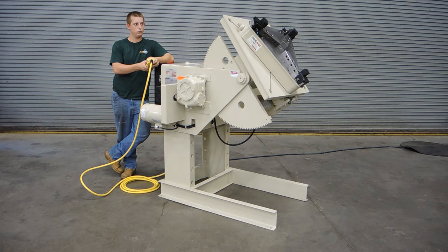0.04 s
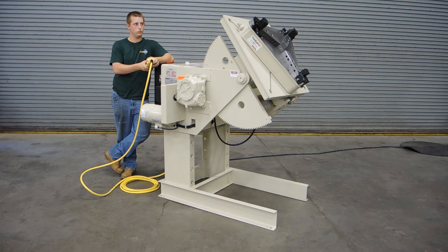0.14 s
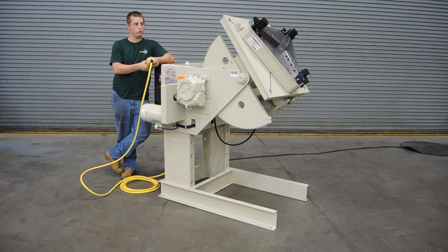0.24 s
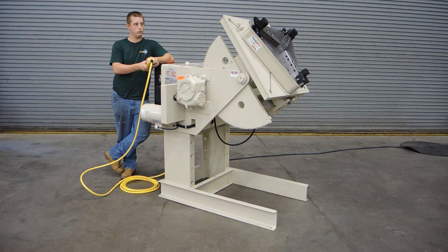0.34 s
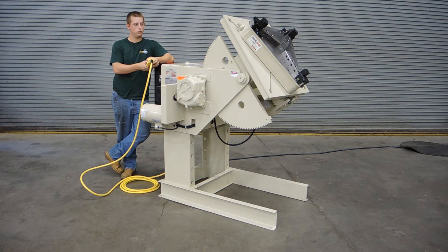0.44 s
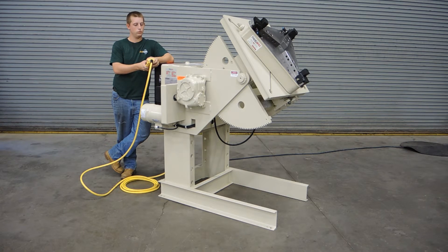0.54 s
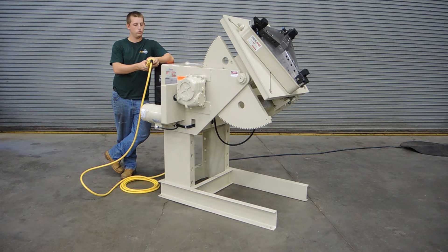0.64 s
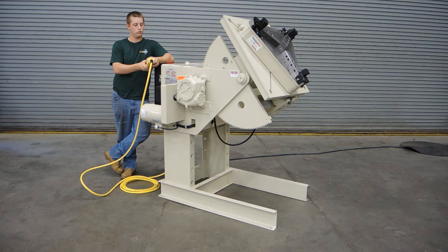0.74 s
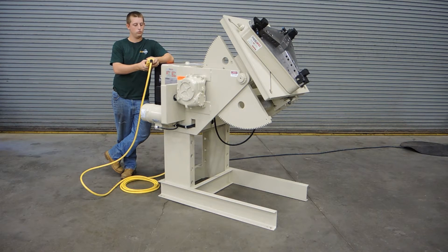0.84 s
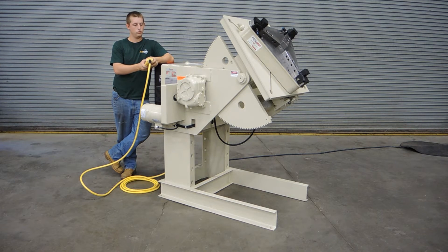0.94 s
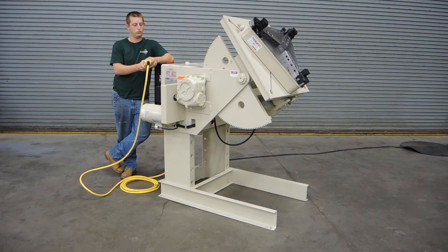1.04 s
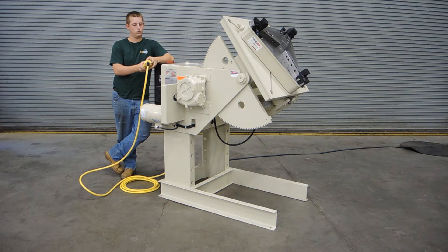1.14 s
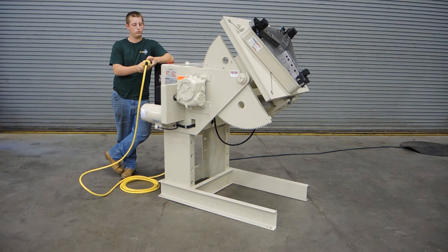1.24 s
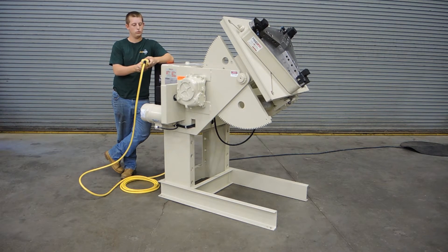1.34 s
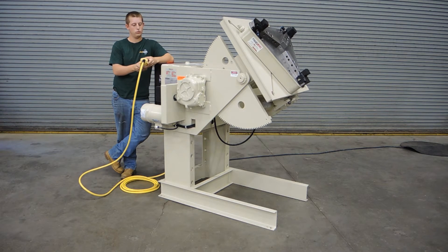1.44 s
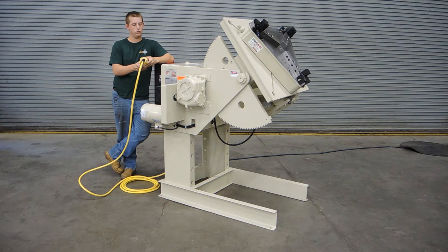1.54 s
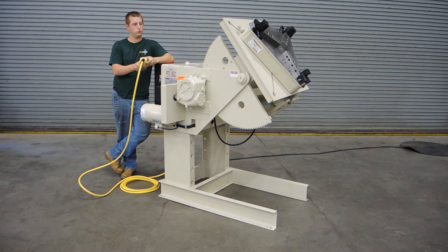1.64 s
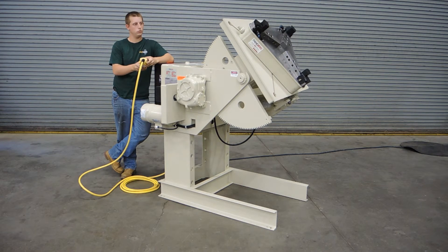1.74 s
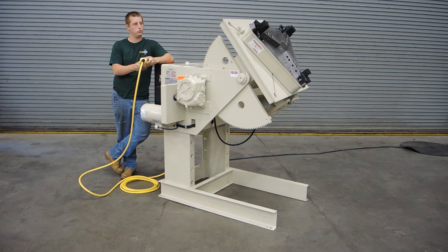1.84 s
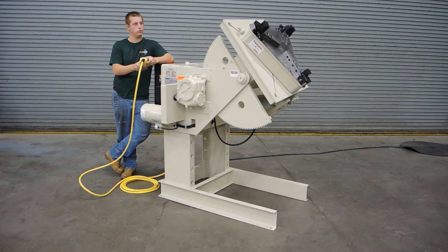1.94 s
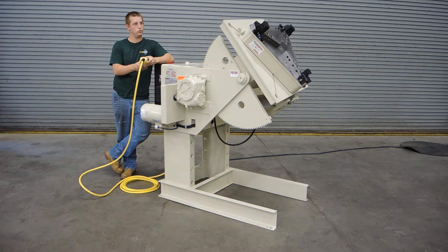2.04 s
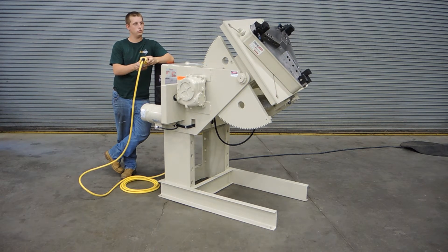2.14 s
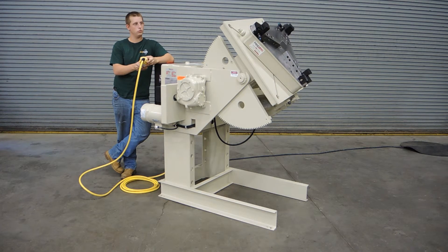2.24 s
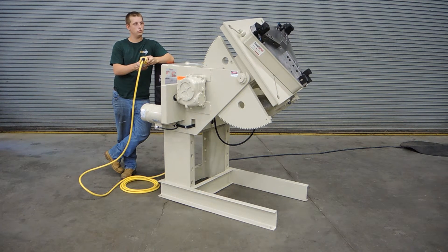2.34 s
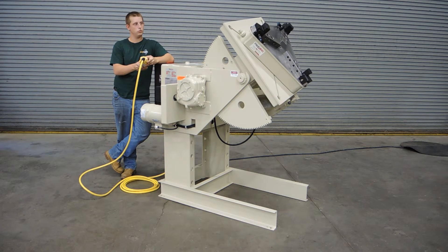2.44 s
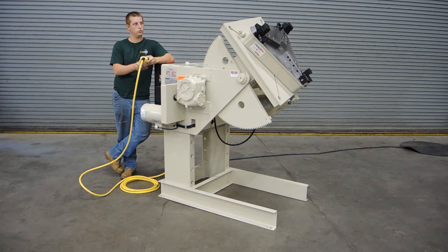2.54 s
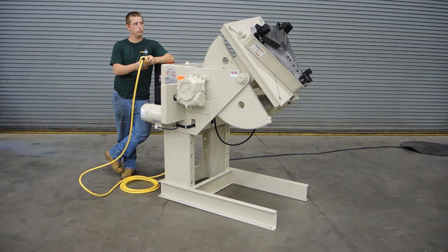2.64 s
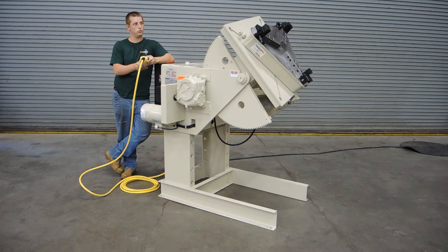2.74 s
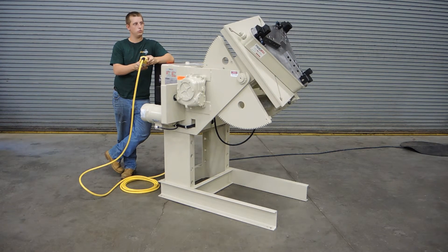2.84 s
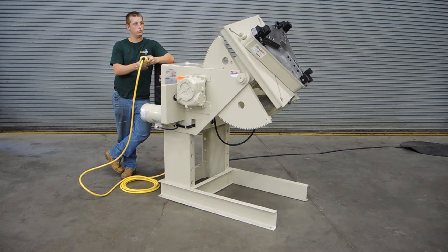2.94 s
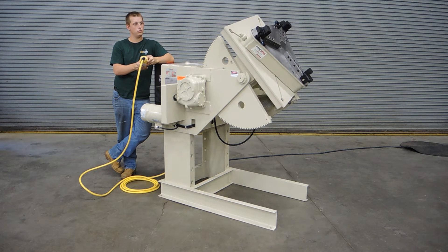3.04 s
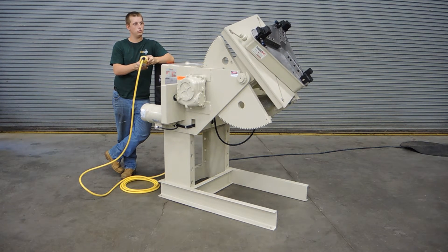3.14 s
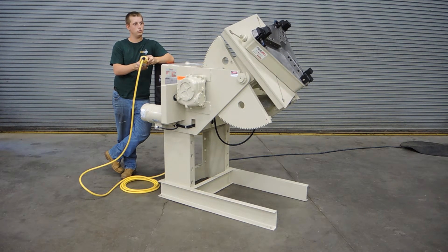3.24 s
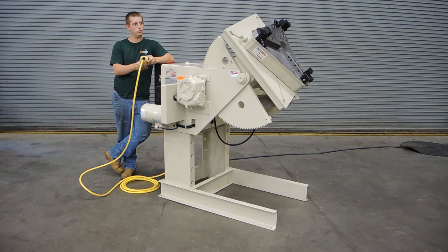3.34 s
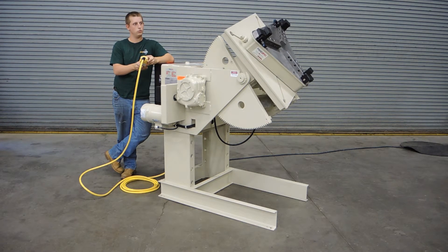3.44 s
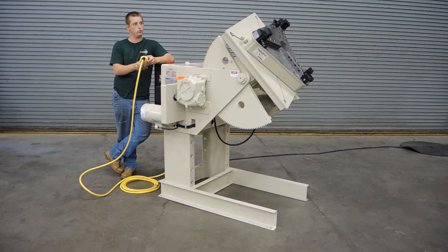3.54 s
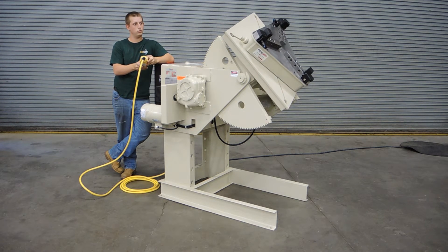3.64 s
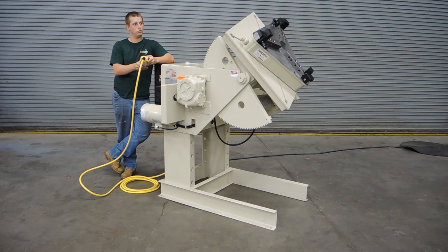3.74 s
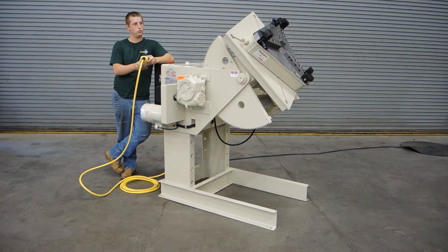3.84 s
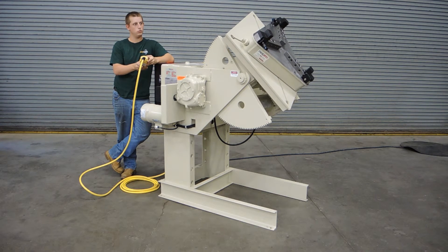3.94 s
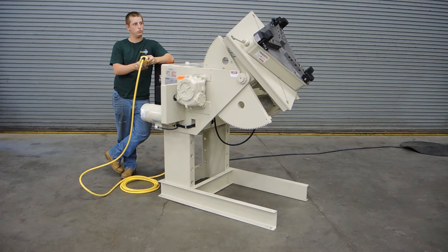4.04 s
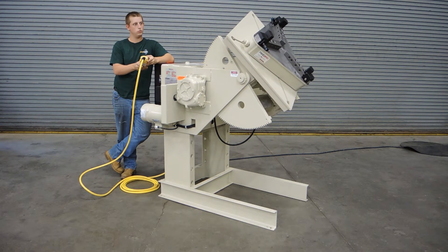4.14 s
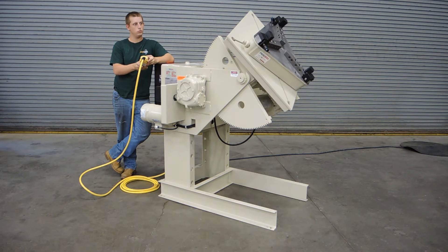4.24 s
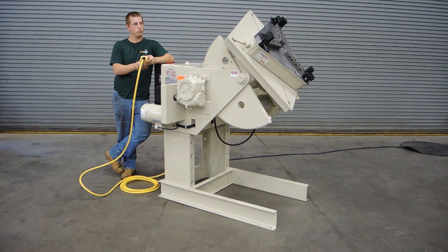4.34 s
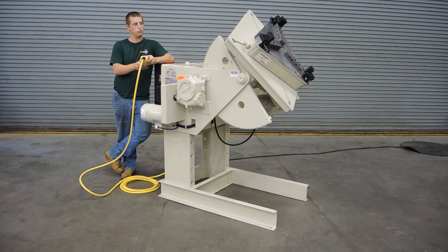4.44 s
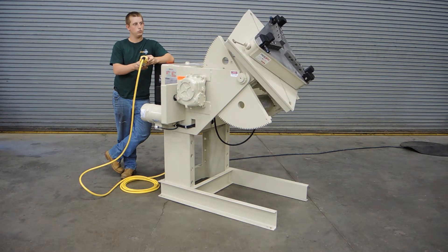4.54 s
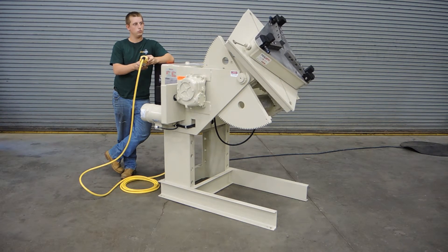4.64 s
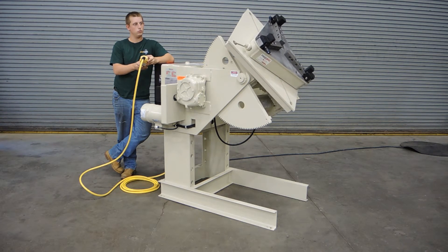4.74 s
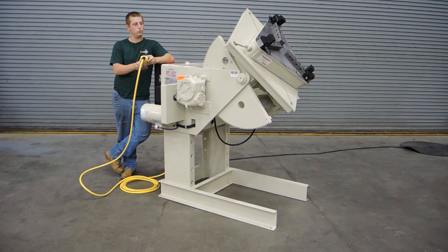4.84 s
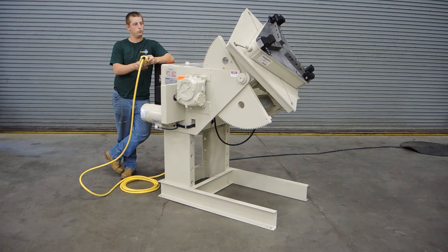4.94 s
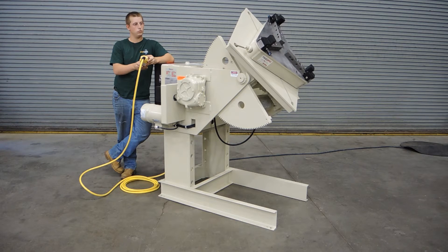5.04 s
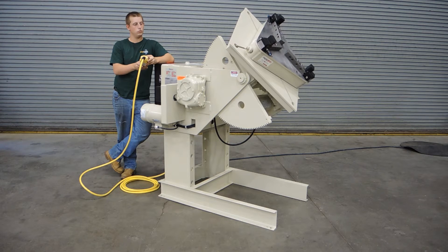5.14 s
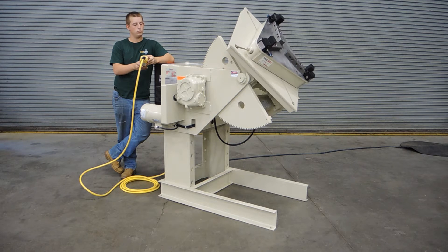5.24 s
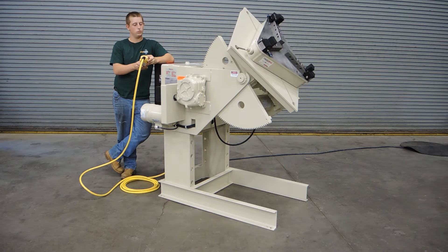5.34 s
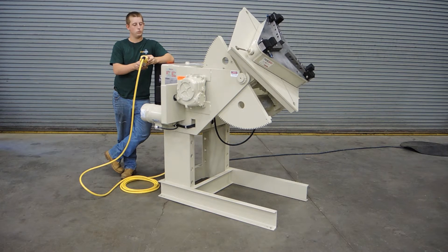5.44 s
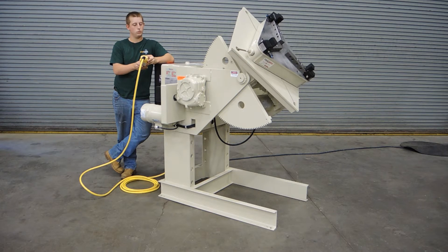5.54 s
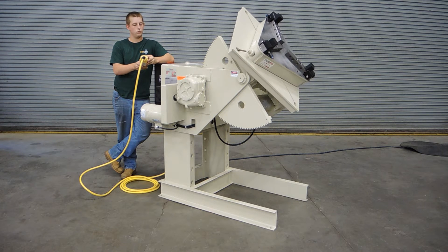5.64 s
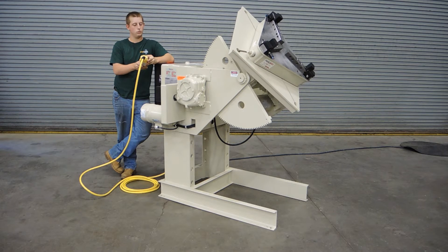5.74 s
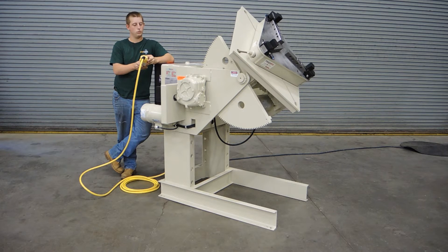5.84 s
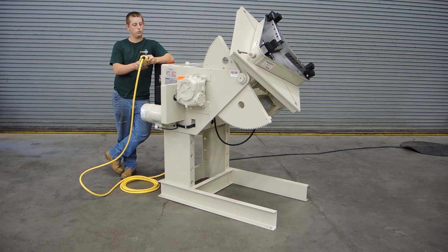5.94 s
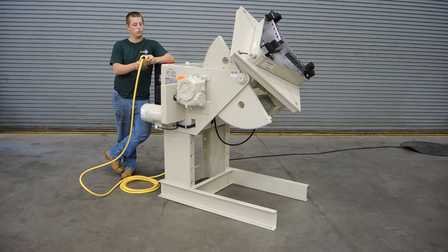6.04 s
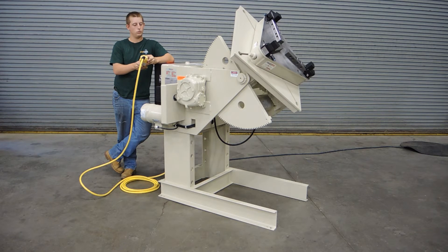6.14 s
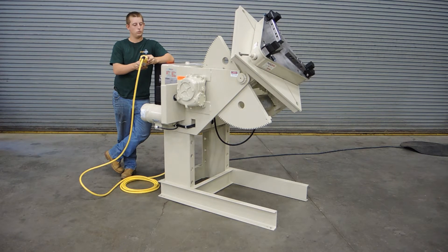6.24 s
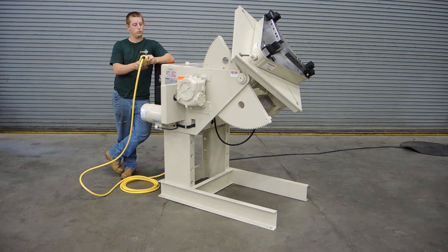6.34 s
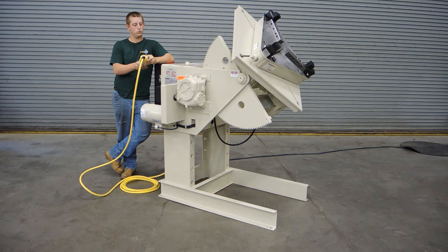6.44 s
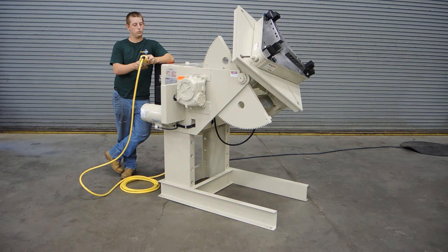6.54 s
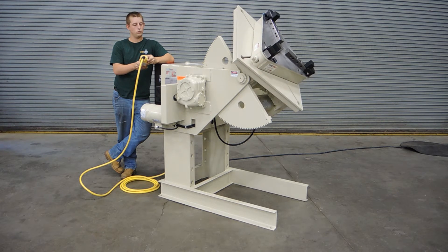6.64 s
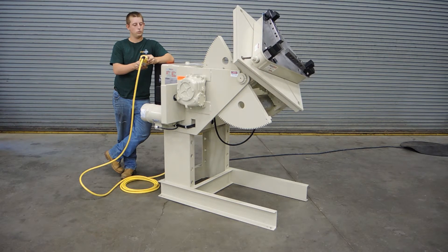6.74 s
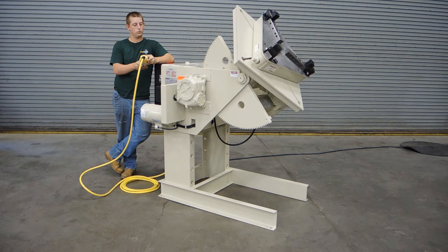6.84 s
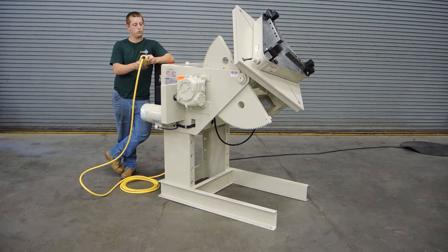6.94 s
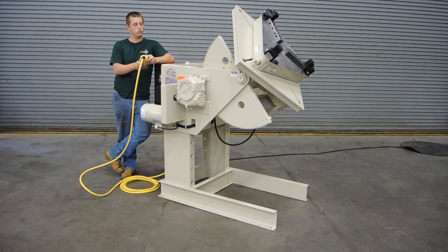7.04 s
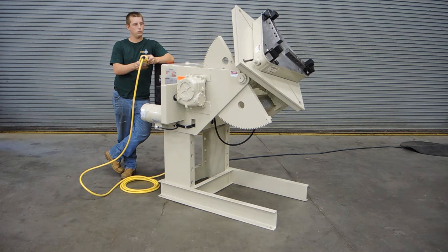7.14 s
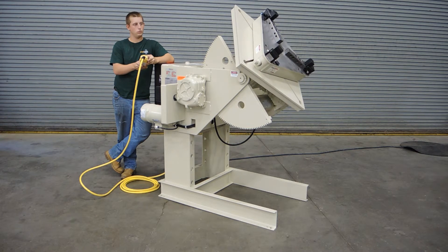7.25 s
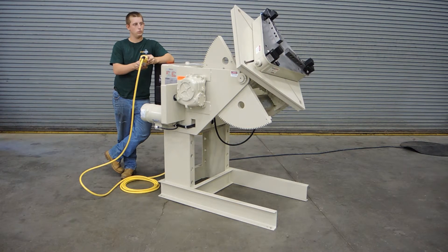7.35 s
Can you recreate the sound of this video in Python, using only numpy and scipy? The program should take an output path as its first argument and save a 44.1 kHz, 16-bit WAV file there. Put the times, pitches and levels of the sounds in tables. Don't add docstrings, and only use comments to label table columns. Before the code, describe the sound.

From 0 to 0.5 s there is only soft workshop air and a low wavering hum of distant machines. At about 0.51 s a button gives three tiny dry snaps within a few hundredths of a second. From 0.65 s a thin, high electronic whistle of several fixed tones swells and pulses, while a muted gear growl starts climbing. Short bursts of hiss surge around 0.8 to 1.25 s. Near 1.3 s the whistle dissolves into bright, rough hiss, the brake frees, and whine and rattle rise rapidly, levelling near 2 s. The background then seems pushed down. From 2 to 6.6 s a steady mid-pitched gear whine around 450 Hz throbs with buzzing side tones and constant hiss; its octave gradually weakens. After 6.65 s the pitch sags slightly and the octave strengthens again, still running at the end, about 7.4 s. Stereo, with diffuse hall reflections.

```python
import sys
import numpy as np
from scipy import signal
from scipy.fft import rfft, irfft, next_fast_len
from scipy.io import wavfile
from scipy.ndimage import uniform_filter1d

SR = 44100
rng = np.random.default_rng(int(sys.argv[2]) if len(sys.argv) > 2 else 0)


def inscribe(sig):
    pcm = np.round(np.clip(np.atleast_2d(sig).T, -1, 1) * 32767)
    wavfile.write(sys.argv[1], SR, pcm.astype(np.int16))


def convert_level_to_amplitude(level_db):
    exponent = np.asarray(level_db, float) / 20
    return 10 ** exponent


N = 325458

PINION_TEETH, WHEEL_TEETH = 15, 36
FULL_HZ = 449.1

# multiple of the tooth rate, pinion turns added, wheel turns added, level in dB.
GEAR_LINES = [(0.5, 0, 0, -45), (1, -6, 0, -46), (1, -3, 1, -46), (1, -2, -1, -44), (1, -2, 0, -45),
              (1, -1, -2, -43), (1, -2, 1, -42), (1, -1, -1, -42), (1, -1, 0, -33.5), (1, -1, 1, -42),
              (1, 0, -1, -48), (1, 0, 1, -34.5), (1, 1, -1, -34), (1, 1, 0, -37), (1, 1, 1, -38),
              (1, 2, -1, -46), (1, 2, 0, -41), (1, 3, 0, -40), (1.5, 0, 0, -41), (2, -1, -4, -48),
              (2, -1, -1, -47), (2, -1, 0, -35), (2, 0, -1, -43), (2, 0, 1, -45), (2, 1, 0, -47),
              (2, 2, 0, -49), (3, -1, 0, -54), (3, 0, 0, -52), (3, 1, 0, -50), (3.5, 0, 0, -49)]
# centre in Hz, width in Hz, whine level in dB.
SWEPT_MODES = [(278, 20, -28), (324.6, 20, -17), (365, 17, -17), (392.4, 13, -10.5), (428.6, 9.6, -22),
               (469, 4.8, -23), (469, 41, -17.5), (510, 21, -21), (570, 83, -18.5), (656, 110, -28),
               (786, 20, -24), (830, 20, -16), (861.7, 27, -17.5), (893, 35, -17)]
# time in seconds, load in dB.
TOOTH_LOAD = [(2.1, -0.7), (3.0, -3), (3.7, -4.5), (4.4, -8.5), (5.3, -10.5), (6.76, -12), (6.83, -0.5),
              (6.89, -10.5), (7.05, -6), (7.12, -0.5), (7.38, 2.8)]
# centre in Hz, width in Hz, level in dB.
HOUSING_MODES = [(258.8, 10.7, -12.5), (379.5, 46, -3.5), (451, 125, -5), (530, 46, -8), (672, 27, -10.5),
                 (819, 16, -16.5), (836, 38, -6.5), (887, 26, -2.5), (944, 86, -4), (1314, 104, -12),
                 (1430, 31, -16.5), (1643, 22, -18.5), (1798, 52, -11)]
# time in seconds, level in dB.
SLOT_BEAT = [
    (1.22, -56),
    (1.3, -35),
    (1.38, -33.5),
    (1.5, -41),
    (1.58, -35),
    (1.68, -57),
    (1.8, -80),
]
# carrier multiple, centre in dB, lower side in dB, upper side in dB, start in seconds.
WHISTLE_LINES = [(2, -1, -2.5, -8, 0.75), (3, -9, -11, -9, 0.74), (4, 2.5, -3, -9, 0.64),
                 (5, -18, -20, -20, 0.9), (6, -17, -15, -16, .76)]
# time in seconds, centre lines in dB, side lines in dB.
SWITCHING_LEVEL = [
    (.63, -50, -60),
    (.7, -43, -56),
    (.75, -37, -45),
    (1.0, -37.5, -36),
    (1.25, -36.5, -36.5),
    (1.31, -70, -70),
]
# frequency in Hz, density in dB per Hz.
HISS_SPECTRUM = [(700, -40), (1200, -11.5), (1900, -15), (2800, -12), (3400, -7.5), (4200, -5.5),
                 (5600, -0.5), (6400, -6), (7400, -4.5), (8000, -1.5), (9200, 0.5), (10200, -1),
                 (11700, -8), (13000, -12.5), (14300, -18.5)]
# centre in Hz, width in Hz, height over the spectrum in dB.
MOTOR_MODES = [(2670, 37, 4), (2810, 36, 3), (2961, 29, 4), (3305, 80, 4), (3575, 71, 5), (3704, 23, 2),
               (3811, 23, 4), (3876, 63, 8), (4296, 80, 7), (4490, 33, 7), (4597, 36, 7), (4748, 80, 8),
               (4899, 25, 2), (4953, 80, 2), (5200, 63, 3), (5405, 39, 4), (5749, 33, 4), (5835, 79, 5),
               (5997, 43, 6), (6126, 55, 3), (6309, 58, 6), (6471, 24, 3), (6589, 80, 4), (6815, 32, 4),
               (6880, 48, 5),
               (7063, 65, 4), (7160, 80, 7), (7601, 57, 6), (7881, 22, 8), (7935, 80, 8), (8247, 25, 4),
               (8366, 79, 6), (8441, 31, 5), (8753, 54, 6), (8882, 33, 5), (8969, 23, 4), (9141, 80, 9),
               (9388, 65, 6), (9528, 53, 6), (9776, 74, 4), (10347, 64, 6), (10487, 80, 8), (10864, 73, 4),
               (11122, 58, 4), (11283, 80, 8), (11434, 27, 6), (11714, 60, 4), (12349, 65, 5),
               (12532, 36, 3), (12985, 33, 4), (13404, 80, 5), (13674, 31, 3), (13867, 50, 4),
               (14018, 56, 7), (14158, 30, 4)]
# time in seconds, rise of the hiss in dB.
CURRENT_SURGES = [
    (.835, 5),
    (.938, 6),
    (.99, 5),
    (1.163, 5),
    (1.245, 3),
]
# time in seconds, peak in dB.
BUTTON_CLICKS = [
    (0.5087, -25),
    (0.5184, -29),
    (0.5344, -28),
]
# frequency in Hz, density in dB per Hz.
SHOP_SPECTRUM = [(16, -44), (31, -14), (86, -15.5), (123, -10), (213, -10), (307, -14), (332, -17),
                 (545, -8.5), (764, -15), (1100, -13), (1760, -15), (2000, -14), (2740, -16.5), (6630, -20),
                 (14100, -35)]
# centre in Hz, width in Hz, level in dB.
MACHINE_HUMS = [(61.6, 12, -53), (123, 10.3, -43.5), (176, 26, -45.5), (206.4, 24, -46.5)]
# time in seconds, gain in dB.
GAIN_CONTROL = [
    (0, 1.5),
    (1.3, 1.5),
    (1.6, 2.5),
    (2.0, -5),
    (7.38, -3),
]
# frequency in Hz, side minus mid in dB.
SIDE_LEVEL = [(60, -6), (110, -14.5), (200, -19), (370, -16), (680, -22.5), (1240, -13), (2280, -17),
              (4170, -10.5), (7640, -7.5), (14000, -6.5)]
# frequency in Hz, left minus right in dB.
LEFT_LEAN = [(60, -2), (110, -2), (200, -0.5), (370, -2.5), (680, 2), (1240, -2.5), (2280, 3), (4170, -4),
             (7640, -1), (14000, 2.5)]


def speed():
    start_s, ramp_hz_per_s, rounding_s = .645, 355, .36
    slow_s, sag_hz_per_s, drag_share = 6.63, 32, .075
    t = np.arange(N) / SR
    ramp = np.clip(ramp_hz_per_s * (t - start_s), 0, FULL_HZ)
    rounded = uniform_filter1d(ramp, size=round(rounding_s * SR), mode="nearest")
    slowing = sag_hz_per_s * np.maximum(t - slow_s, 0)
    return np.maximum(rounded * (1 - drag_share * drag()) - slowing, 1)


def drag():
    release_s, release_length_s = 1.2, 0.0685
    return np.clip(1 - (np.arange(N) / SR - release_s) / release_length_s, 0, 1)


def by_speed(db_per_decade, knee_hz):
    return db_per_decade * np.log10(np.minimum(speed() / knee_hz, 1))


def gears(teeth):
    first_db, octave_db, sides_db, pan_db, second_db, fourth_db = whine_levels()
    slack = np.clip(1 - np.gradient(teeth) * SR / 2800, 0, .3)
    first_db = first_db + 12 * slack * drift(18)
    octave_db = octave_db + 12 * slack * drift(18)
    scatter = 1.3
    sides, second = 0, 0
    for multiple, pinion, wheel, db in GEAR_LINES:
        angle = teeth * (multiple + pinion / PINION_TEETH + wheel / WHEEL_TEETH)
        line = tone(angle - late(pinion, wheel), db, scatter) * (1 + 0.32 * drift(2.5))
        if multiple % 1 == 0:
            sides = sides + line
        else:
            second = second + line
    first = tone(teeth, first_db + 1.4 * drift(10), 0)
    fourth = tone(4 * teeth, fourth_db + 4 * drift(25))
    octave = tone(2 * teeth, octave_db + 0.47 * drift(16)) * convert_level_to_amplitude(np.outer([.5, -.5], pan_db))
    return first + convert_level_to_amplitude(sides_db) * sides + convert_level_to_amplitude(second_db) * second + fourth, octave


def whine_levels():
    load_db, = in_time(TOOTH_LOAD)
    rise_db = by_speed(25, FULL_HZ) - 11 * drag()
    first_db = swept_db(speed()) + rise_db + 0.64 * load_db
    octave_db = swept_db(2 * speed()) + rise_db + load_db + 0.53
    sides_db = 1.1 - 0.089 * load_db + by_speed(33, FULL_HZ)
    pan_db = -1.35 + 0.36 * load_db
    second_db = -0.3 + by_speed(25, FULL_HZ)
    peak_s, period_s = 6.1, 4.1
    swing = np.cos(2 * np.pi * (np.arange(N) / SR - peak_s) / period_s)
    fourth_db = -48 + 6 * swing + by_speed(171, FULL_HZ)
    return first_db, octave_db, sides_db, pan_db, second_db, fourth_db


def swept_db(hz):
    grid = np.arange(1000.)
    power = sum(convert_level_to_amplitude(2 * db) / (1 + (2 * (grid - f) / width) ** 2) ** 1.57 for f, width, db in SWEPT_MODES)
    return np.interp(hz, grid, 10 * np.log10(power))


def late(pinion, wheel):
    sweep_s_per_hz = 1.6e-4
    offset_hz = FULL_HZ * (pinion / PINION_TEETH + wheel / WHEEL_TEETH)
    return np.pi * sweep_s_per_hz * offset_hz ** 2


def rattle(teeth):
    level_db, bright_db = rattle_levels()
    wear = rng.standard_normal(256)
    turns = teeth / (2 * np.pi * PINION_TEETH)
    profile = wear[(turns % 1 * len(wear)).astype(int)]
    overtones = sum(tone(k * teeth / 2, -12 + 4 * drift(8)) for k in range(5, 13))
    oiled = np.gradient(teeth) * SR > 2700
    repeating = (profile + overtones) * convert_level_to_amplitude(-2.5 - 12 * oiled)
    knocks = rng.standard_normal(N) * convert_level_to_amplitude(1.5 * drift(25) + 5) + repeating
    out = 0
    for hz, width, db in HOUSING_MODES:
        once = resonance(knocks, hz, width * 1.31)
        mode = rms_one(resonance(once, hz, width * 1.31))
        out = out + mode * convert_level_to_amplitude(db + (700 < hz < 1100) * bright_db + 2.16 * drift(3.6))
    return convert_level_to_amplitude(level_db) * out


def rattle_levels():
    settle_hz, settle_width_hz, settle_db = 320, 31, -4
    settled = np.clip((speed() - settle_hz) / settle_width_hz, 0, 1)
    level_db = -27.5 + by_speed(33.5, 298) + settle_db * settled
    loose_db = 1 - settled
    return level_db, 1.2 + loose_db + np.minimum(by_speed(-17, 193), 9.0)


def inverter(teeth):
    carrier_hz, beat_order = 2000, 9
    pulse_s = .895
    centre_db, sides_db = in_time(SWITCHING_LEVEL)
    t = np.arange(N) / SR
    carrier = 2 * np.pi * carrier_hz * t
    supply = 2 * teeth / PINION_TEETH
    supply = supply - supply[round(pulse_s * SR)]
    out = tone(carrier - beat_order * supply, in_time(SLOT_BEAT)[0] + 2.9 * drift(7.9))
    for k, mid_db, low_db, up_db, start in WHISTLE_LINES:
        k = round(k)
        lines = tone(k * carrier, centre_db + mid_db + 2.0 * drift(10.0), 0)
        lines += tone(k * carrier - 2 * supply, sides_db + low_db + 1.3 * drift(11), 0)
        lines += tone(k * carrier + 2 * supply, sides_db + up_db + 1.7 * drift(8.6), 0)
        out = out + lines * np.clip((t - start) / .015, 0, 1)
    return out


def frame(teeth):
    modes = [(hz, width, db + .6) for hz, width, db in MOTOR_MODES]
    noise = coloured(rng.standard_normal(N), HISS_SPECTRUM, modes)
    turning_db = .33 * (np.sin(teeth / PINION_TEETH) + np.sin(teeth / WHEEL_TEETH))
    throb_db = turning_db + .5 * drift(7.4) + .5 * drift(110)
    edges = np.geomspace(900, 16000, 13)
    patchy = 0
    for k, pair in enumerate(zip(edges, edges[1:])):
        band = signal.sosfilt(signal.butter(2, pair, "band", fs=SR, output="sos"), noise)
        sign = (-1) ** k
        patchy = patchy + band * sign * convert_level_to_amplitude(.5 * drift(0.19) + 0.49 * drift(20.0))
    return convert_level_to_amplitude(hiss_level() + throb_db) * rms_one(patchy)


def hiss_level():
    rise_s, fall_s = .01, .03
    t = np.arange(N) / SR
    surge_db = sum(db * np.exp(-((t - s) / np.where(t < s, rise_s, fall_s)) ** 2) for s, db in CURRENT_SURGES)
    steady_db = 0.34 * in_time(GAIN_CONTROL)[0] - 0.088 * in_time(TOOTH_LOAD)[0]
    return -15 + by_speed(35, 276) + surge_db + steady_db


def button():
    t = np.arange(N) / SR
    snap = sum(convert_level_to_amplitude(db) * (t > s) * np.exp(-np.maximum(t - s, 0) / 0.0044) for s, db in BUTTON_CLICKS)
    return convert_level_to_amplitude(-7) * snap * rms_one(resonance(rng.standard_normal(N), 8300, 6000))


def shop():
    air_db = -29.5 - 3.5 + .5 * drift(4.8)
    air = convert_level_to_amplitude(air_db) * rms_one(coloured(rng.standard_normal(N), SHOP_SPECTRUM))
    hums = sum(convert_level_to_amplitude(db) * rms_one(resonance(rng.standard_normal(N), hz, width)) for hz, width, db in MACHINE_HUMS)
    return convert_level_to_amplitude(in_time(GAIN_CONTROL)[0]) * (air + hums)


def walls(x):
    t60_s = .6
    t = np.arange(int(t60_s * SR)) / SR
    echoes = rng.standard_normal(len(t)) * convert_level_to_amplitude(-60 * t / t60_s)
    return signal.fftconvolve(x, echoes / np.sqrt(np.sum(echoes ** 2)))[:N]


def rms_one(x):
    return x / np.sqrt(np.mean(x ** 2) + 1e-20)


def in_time(rows):
    s, *columns = np.transpose(rows)
    return [np.interp(np.arange(N) / SR, s, c) for c in columns]


def coloured(x, points, modes=()):
    size = next_fast_len(N)
    hz = np.maximum(np.arange(size // 2 + 1) * SR / size, 1)
    point_hz, point_db = np.transpose(points)
    gain = convert_level_to_amplitude(np.interp(np.log(hz), np.log(point_hz), point_db))
    peaks = sum(convert_level_to_amplitude(2 * db) / (1 + (2 * (hz - f) / width) ** 2) ** 2 for f, width, db in modes)
    return irfft(rfft(x, size) * gain * np.sqrt(1 + peaks), size)[..., :N]


def drift(rate):
    hop = 40
    r = np.exp(-2 * np.pi * hop * rate / SR)
    chance = rng.standard_normal(N // hop + 2002)
    slow = signal.lfilter([1], [1, -2 * r, r * r], chance)[2000:]
    return np.interp(np.arange(N) / hop, np.arange(len(slow)), rms_one(slow))


def resonance(x, hz, width):
    r = np.exp(-np.pi * width / SR)
    poles = [1, -2 * r * np.cos(2 * np.pi * hz / SR), r * r]
    return signal.lfilter(np.array([1, 0, -1]) * (1 - r * r) / 2, poles, x)


def tone(angle, db, scatter=np.pi):
    return np.sqrt(2) * convert_level_to_amplitude(db) * np.sin(angle + scatter * rng.uniform(-1.174, 1))


def scene():
    teeth = 2 * np.pi * np.cumsum(speed()) / SR
    whine, octave = gears(teeth)
    noisy = rattle(teeth) + inverter(teeth) + frame(teeth) + button() + shop()
    side = convert_level_to_amplitude(-0.5) * coloured(walls(noisy + convert_level_to_amplitude(-11) * whine), SIDE_LEVEL)
    left = coloured(noisy, [(hz, db / 2) for hz, db in LEFT_LEAN])
    right = coloured(noisy, [(hz, -db / 2) for hz, db in LEFT_LEAN])
    return np.array([left, right]) + whine + octave + side * [[1], [-1]]


def band_limit(x):
    return signal.sosfilt(signal.butter(12, 14610, fs=SR, output="sos"), x)


def record(dry):
    rounded = 1.293 * np.tanh(dry / 1.302)
    cut = signal.ellip(12, .3, 60, 14190, fs=SR, output="sos")
    return band_limit(signal.sosfilt(cut, rounded))


dry = scene()
out = record(dry)
inscribe(out)
```